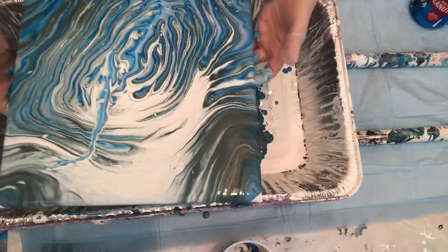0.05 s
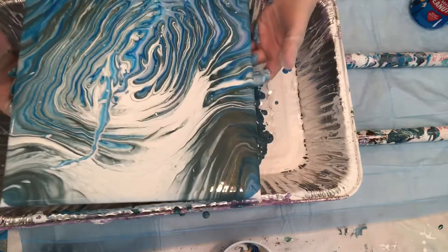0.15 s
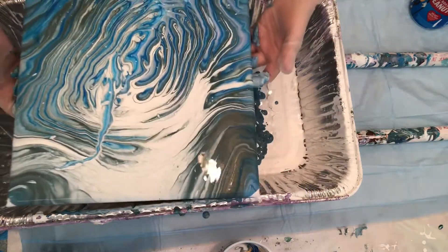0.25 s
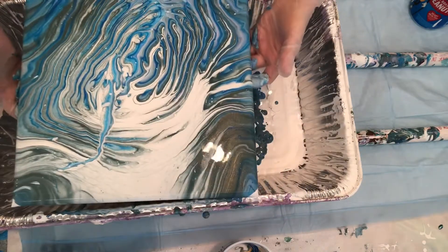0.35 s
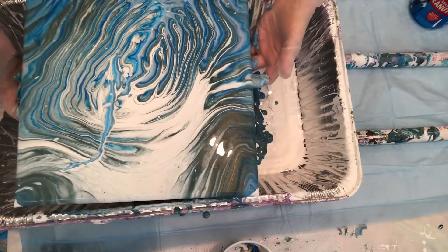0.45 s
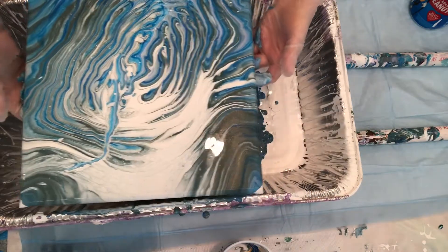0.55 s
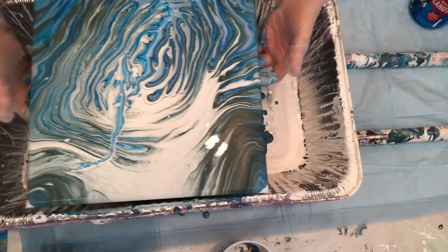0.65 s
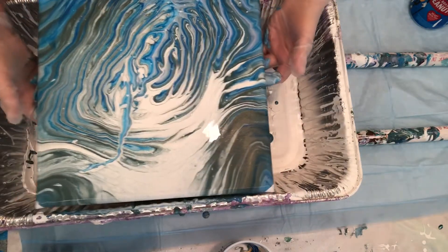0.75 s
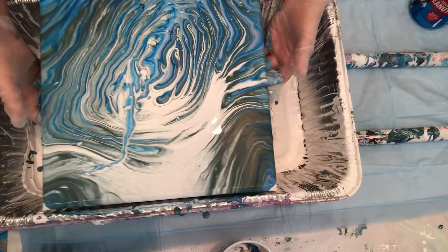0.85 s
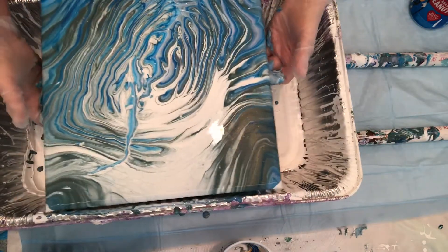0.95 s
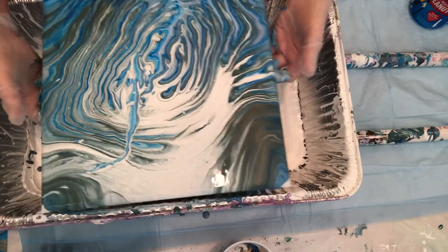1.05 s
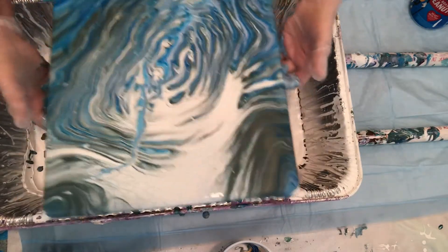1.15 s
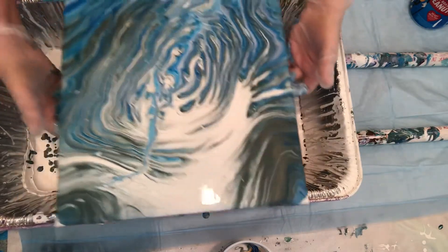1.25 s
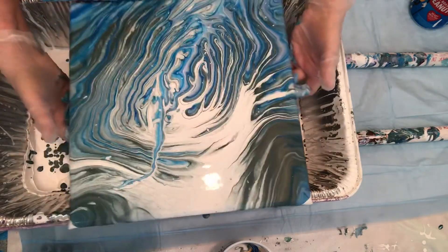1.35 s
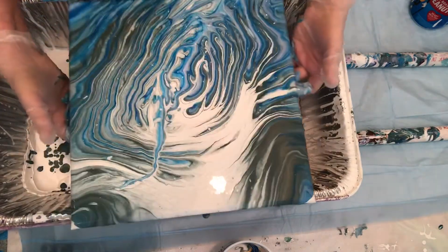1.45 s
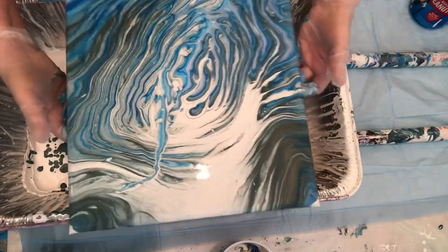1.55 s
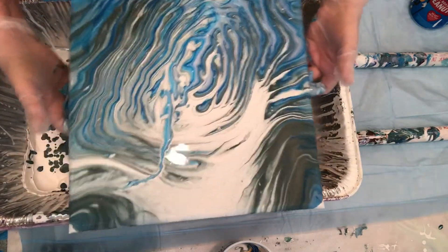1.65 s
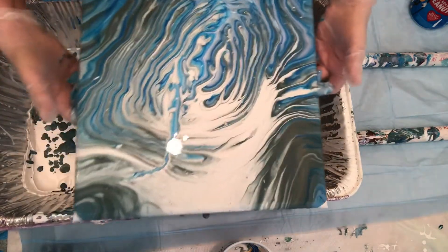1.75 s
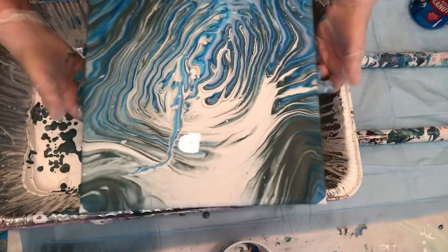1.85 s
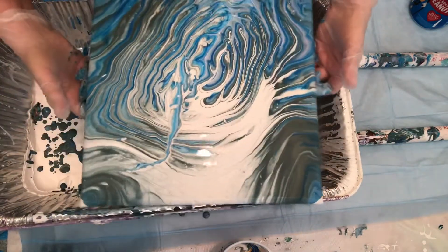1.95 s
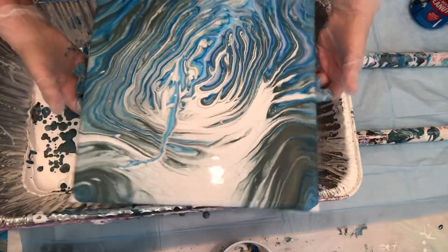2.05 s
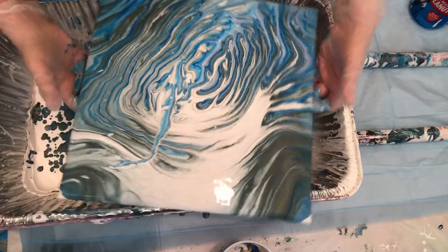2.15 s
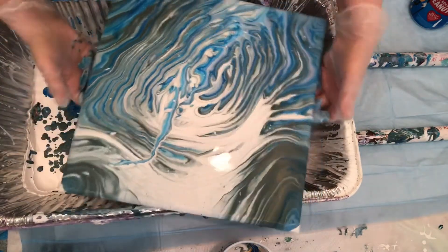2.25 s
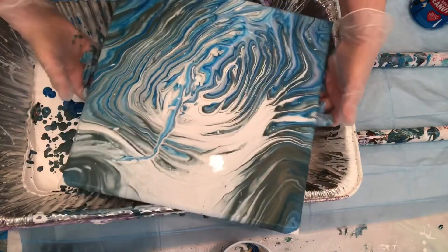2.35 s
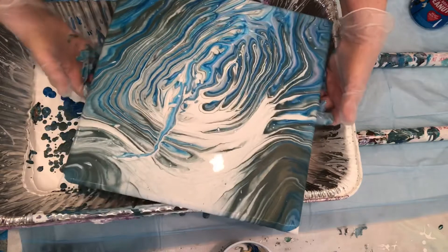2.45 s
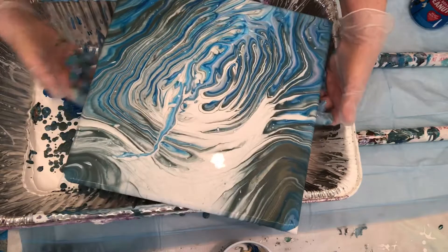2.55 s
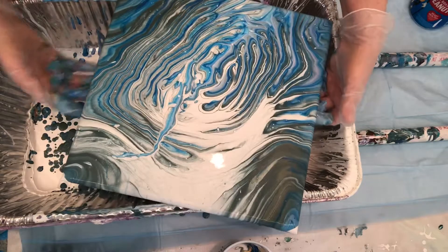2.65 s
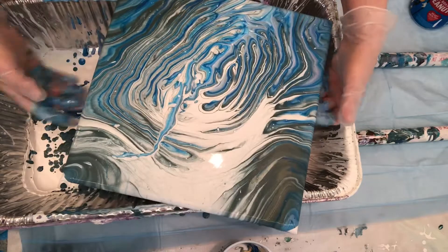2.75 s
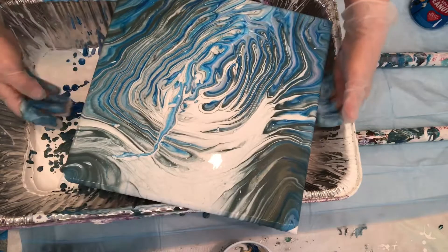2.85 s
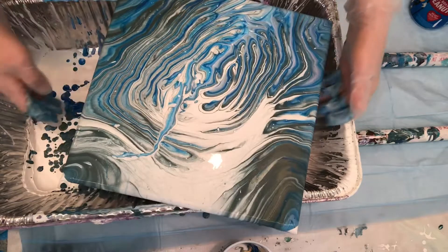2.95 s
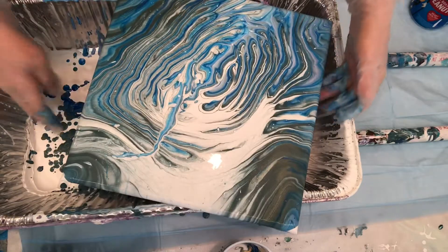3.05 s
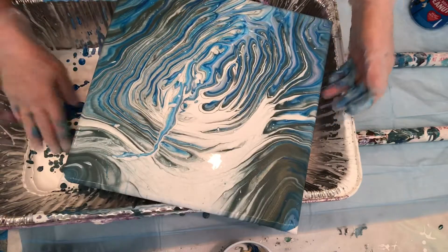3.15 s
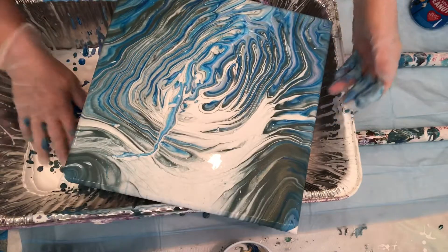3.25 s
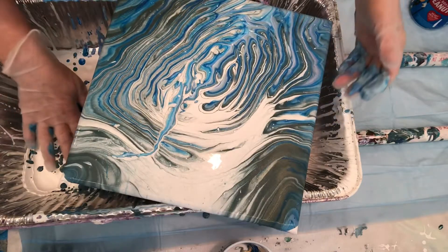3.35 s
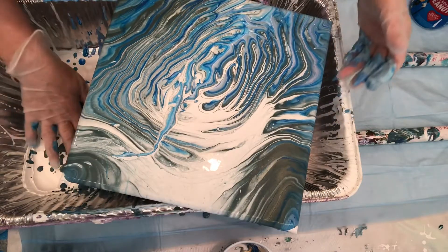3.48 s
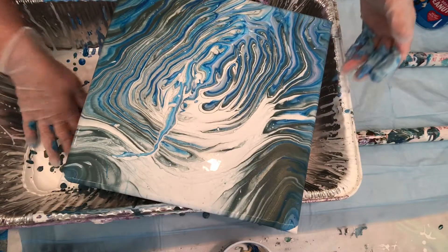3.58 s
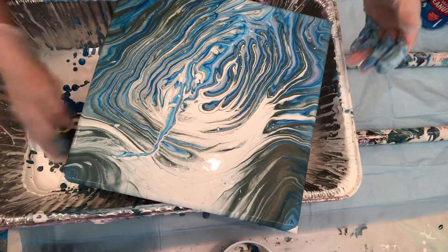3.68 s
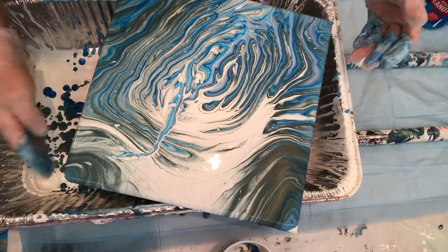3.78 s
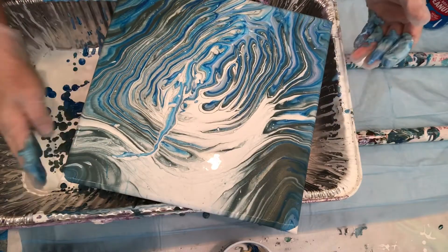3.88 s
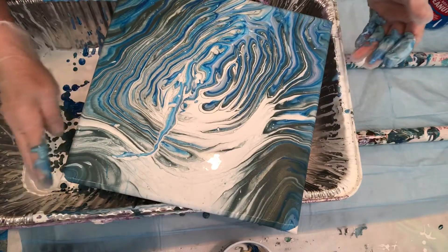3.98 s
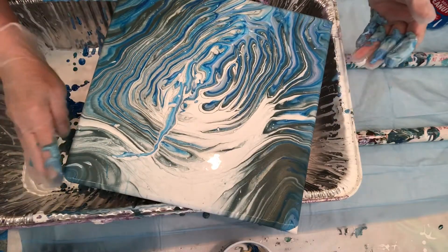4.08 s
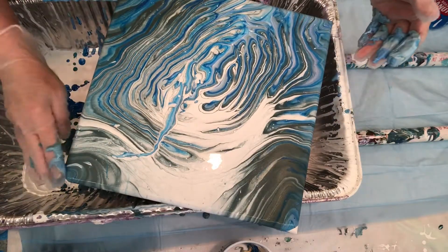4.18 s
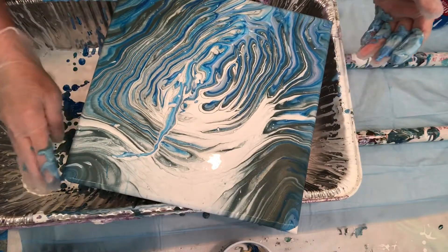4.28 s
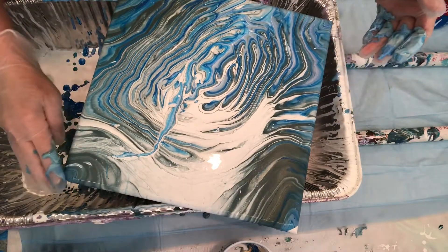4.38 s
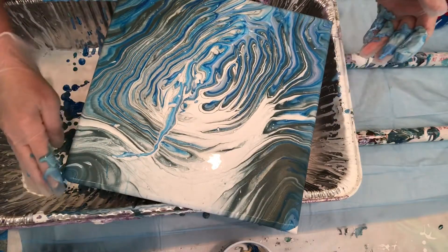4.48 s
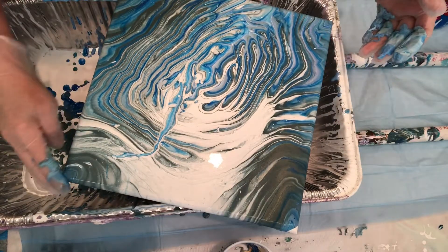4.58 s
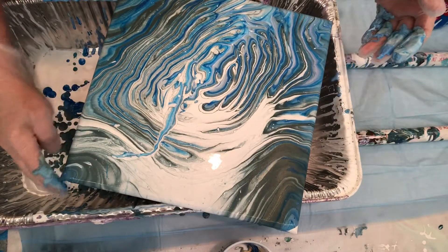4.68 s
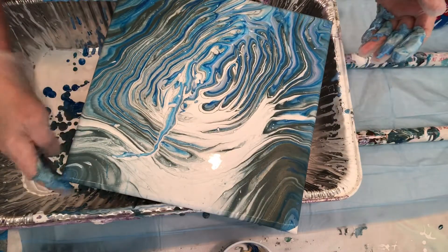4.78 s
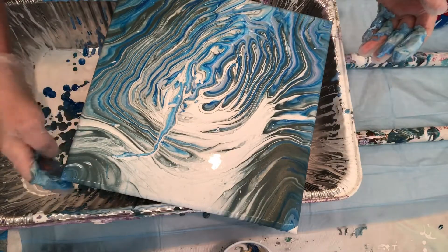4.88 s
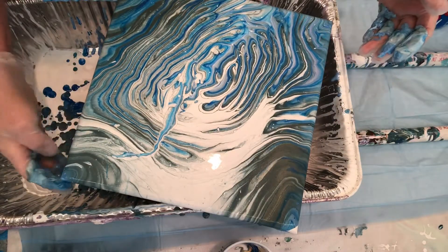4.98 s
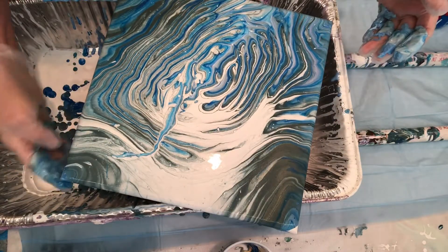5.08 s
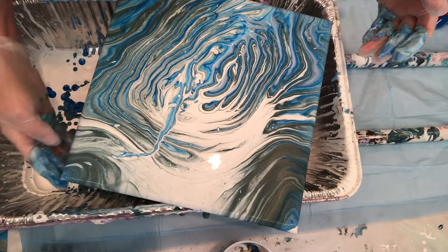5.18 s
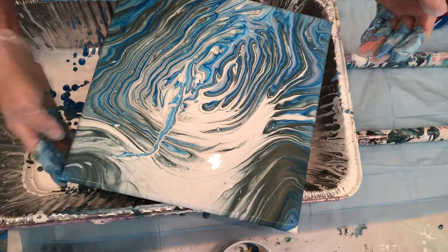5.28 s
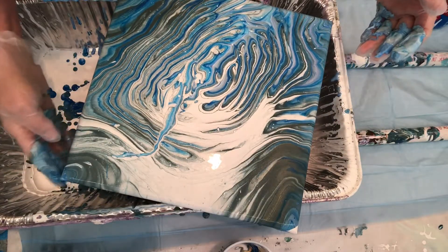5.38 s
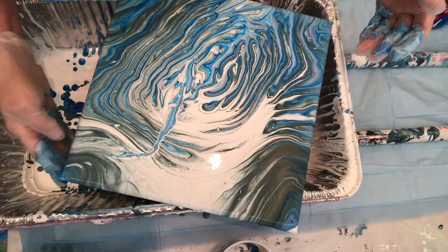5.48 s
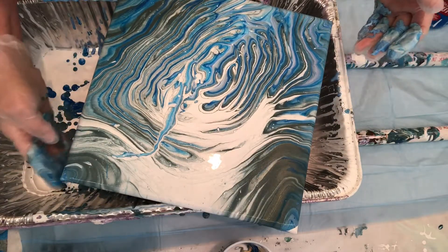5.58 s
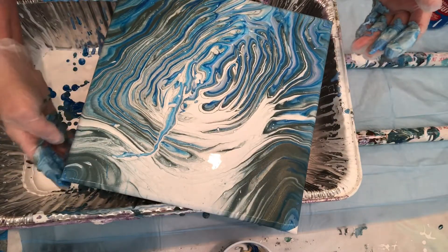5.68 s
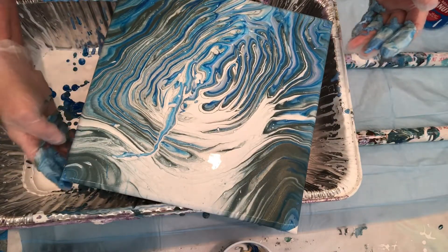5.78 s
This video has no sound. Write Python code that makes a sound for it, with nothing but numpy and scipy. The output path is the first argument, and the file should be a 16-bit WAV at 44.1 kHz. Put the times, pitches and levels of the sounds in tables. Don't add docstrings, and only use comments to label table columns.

```python
import sys
import numpy as np
from scipy import signal
from scipy.fft import rfft, irfft
from scipy.io import wavfile
from scipy.ndimage import uniform_filter1d

SR = 44100
rng = np.random.default_rng(int(sys.argv[2]) if len(sys.argv) > 2 else 0)


def to_wav(sig):
    pcm = np.clip(np.atleast_2d(sig), -1, 1) * 32767
    pcm = np.round(pcm).astype(np.int16)
    wavfile.write(sys.argv[1], SR, pcm.T)


def level_to_linear(level):
    exponent = np.asarray(level, float) / 20
    return 10 ** exponent


N = 257103

# pitch_hz, level_db, t60_s
CANVAS_MODES = [(262, -13, .08), (290, -9, .15), (327, 0, .2), (375, -14, .08), (428, -15, .2)]
# pitch_hz, level_db, t60_s
FRAME_MODES = [(436, -9, .06), (520, -4, .06), (590, -5, .06), (660, -4, .06), (745, -5, .045),
               (835, 0, .06), (910, -2, .05), (985, -4, .045), (1170, -6, .04), (1290, -4, .04),
               (1430, -3, .045), (1600, -13, .035), (1860, -9, .035)]
# pitch_hz, width_hz, level_db
ROD_MODES = [(2270, 85, -1), (2860, 100, -5), (3770, 130, -12), (5500, 170, 0), (6170, 200, -12),
             (6890, 250, -10), (7550, 300, -6), (8020, 220, 0), (8940, 300, -10), (10100, 450, -6)]
PUSH_ROUGH = 0.25
CANVAS_SCATTER_DB = 1.5


def evened(x):
    return x / np.sqrt(np.mean(x ** 2) + 1e-20)


def read(points, hz):
    f, value = np.transpose(points)
    return np.interp(np.log(hz + 1), np.log(f + 1), value)


def add(mix, start_s, sound):
    part = mix[round(start_s * SR):][:len(sound)]
    part += sound[:len(part)]


def colour(x, points):
    gain = level_to_linear(read(points, np.fft.rfftfreq(len(x), 1 / SR)))
    return evened(irfft(rfft(x) * gain, len(x)))


def resonate(x, hz, width_hz):
    return signal.lfilter(*signal.iirpeak(hz, hz / width_hz, SR), x)


def grains(per_s, spread_db):
    clicks = rng.standard_normal(N) * level_to_linear(spread_db * np.minimum(rng.exponential(1, N), 4))
    return evened(clicks * (rng.random(N) < per_s / SR))


def wander(smooth_s):
    size = max(round(smooth_s * SR), 2)
    return evened(uniform_filter1d(uniform_filter1d(rng.standard_normal(N), size), size))


def follow(rows, level_db):
    return level_to_linear(np.interp(np.arange(N) / SR, np.asarray(rows)[:, 0], level_db, -140, -140))


def ring(modes, t, contact_s, scatter_db, rough=0.74):
    detune = 0.015
    hz, db, t60_s = np.transpose(modes)[..., None]
    luck = rng.standard_normal((2, len(modes), 1))
    decay = level_to_linear(db + scatter_db * luck[0] - 60 * t / t60_s)
    waves = decay * np.sin(2 * np.pi * hz * (1 + detune * luck[1]) * t)
    contact = (1 - rough + rough * rng.standard_normal(len(t))) * t * np.exp(-t / contact_s)
    band = signal.butter(1, [hz.min() / 2, 1.95 * hz.max()], "band", fs=SR)
    soft = signal.lfilter(*band, contact)
    body = signal.fftconvolve(waves.sum(0), soft)[:len(t)]
    return body / np.sqrt(np.max(uniform_filter1d(body ** 2, 400)))


def burst(t, points, rise_s, crack_t60_s, tail, tail_t60_s):
    decay = level_to_linear(-60 * t / crack_t60_s) + tail * level_to_linear(-60 * t / tail_t60_s)
    return colour(rng.standard_normal(len(t)), points) * (1 - np.exp(-t / rise_s)) * decay


def streaked(x):
    depth_db, width_hz = 2.3, 60
    z = rfft(x)
    size = round(width_hz * N / SR)
    peaks = evened(uniform_filter1d(uniform_filter1d(rng.standard_normal(len(z)), size), size))
    return evened(irfft(z * level_to_linear(depth_db * peaks), len(x)))


def room_tone():
    # pitch_hz, level_db (per Hz)
    air_bands = [(12, -64), (20, -31), (43, -32), (52, -14.5), (75, -1.5), (151, -10.5), (297, -16.5),
                 (465, -13.5), (670, -20.5), (794, -20.5), (2120, -30.5), (2810, -28), (7600, -35),
                 (8600, -51)]
    # pitch_hz, width_hz, level_db
    hum_bands = [(69.5, 18, -74.5), (144.3, 5.6, -73.5), (286, 60, -75), (472.7, 7.6, -80.5)]
    out = level_to_linear(-69.0) * colour(rng.standard_normal(N), air_bands) * level_to_linear(2.05 * wander(0.043))
    for hz, width_hz, db in hum_bands:
        out = out + level_to_linear(db) * evened(resonate(rng.standard_normal(N), hz, width_hz))
    return out


def squeaks():
    # middle_s, length_s, pitch_hz, width_hz, level_db
    squeak_bands = [(0.027, 0.048, 3700, 400, -77.5), (0.62, 0.29, 2000, 250, -84),
                    (0.283, 0.094, 11200, 1100, -75), (2.87, 0.17, 12000, 4000, -76),
                    (2.86, 0.13, 5100, 200, -80), (3.7, 0.024, 800, 91, -69), (3.8, 0.01, 1680, 130, -77),
                    (3.2, 0.13, 6470, 440, -70), (5.045, 0.047, 3220, 300, -71), (1.015, 0.065, 3400, 250, -66),
                    (2.87, 0.12, 5300, 890, -71.5), (3.1, .03, 1130, 120, -65), (3.185, 0.1, 1110, 140, -61),
                    (3.27, 0.026, 1130, 62, -63), (2.61, 0.11, 1960, 64, -81), (5.1, 0.28, 1640, 140, -83),
                    (5.068, 0.035, 804, 140, -65.5), (5.45, 0.15, 462, 26, -77), (3.43, 0.045, 184, 92, -55),
                    (3, 0.36, 320, 250, -69.5), (3.42, 0.081, 387, 114, -60), (0.178, 0.043, 298, 21, -59.5),
                    (0.58, 0.44, 780, 150, -70.5),
                    (.55, .3, 11300, 900, -88),
        (3.69, .06, 1170, 160, -74),
        (4.9, .34, 1660, 260, -78),
        (4.8, .14, 813, 200, -78),
        (2.465, .06, 330, 40, -56),
                    (3.19, .2, 12000, 7000, -71), (3.3, .075, 11000, 8000, -73.5), (.755, .02, 14500, 2500, -60),
              (4.79, .06, 3070, 700, -71), (1.03, 0.095, 900, 200, -55.5), (3.23, .22, 9300, 350, -78),
              (3.15, .015, 4300, 700, -59), (1.025, 0.094, 2070, 600, -59), (1.05, .07, 4700, 900, -74),
              (1.3, .012, 5700, 1200, -50), (2.43, 0.26, 46, 22, -66.5), (.865, 0.037, 780, 1300, -60.5),
              (2.39, 0.032, 411, 38, -50), (2.62, .09, 900, 90, -70), (.64, .4, 2070, 90, -68),
              (.66, .36, 900, 90, -65), (.53, .16, 310, 60, -60), (.94, .05, 300, 60, -58),
              (1.04, .09, 3550, 150, -69), (1.25, .06, 6200, 120, -74), (1.26, .05, 8000, 150, -72),
              (5.595, .04, 3300, 300, -64)]
    t, out = np.arange(N) / SR, np.zeros(N)
    noise = rng.standard_normal(N) * level_to_linear(1.0 * wander(0.006))
    for middle_s, length_s, hz, width_hz, db in squeak_bands:
        swell = np.exp(-(2 * (t - middle_s) / length_s) ** 4)
        tone = evened(resonate(resonate(noise, hz, width_hz), hz, 2 * width_hz))
        out += level_to_linear(db) * swell * tone
    return out


def shaken(modes):
    # pitch_hz, level_db
    slip_tilt = [(300, 4), (900, 1), (1500, -5.5), (5000, -28)]
    unevenness_db, width_times_t60 = 2, 3.5
    slips = colour(grains(3000, 1.0) * level_to_linear(unevenness_db * wander(0.012)), slip_tilt)
    return evened(sum(level_to_linear(db) * resonate(slips, hz, width_times_t60 / t60_s) for hz, db, t60_s in modes))


def slides():
    # time_s, pressure_db, speed_db (hiss over pressure)
    drags = [
        [(.075, -58, -12), (.13, -57, -17), (.22, -72, -16), (.3, -50, -14), (.42, -62, -2.5), (.7, -60, -1),
         (.86, -57, -1.5), (.9, -62.5, -6), (.965, -66.5, -10)],
        [(.97, -68, -11), (.995, -52, -14), (1.07, -53.5, -4), (1.1, -62, -9), (1.18, -53.5, -7.5),
         (1.25, -58, -4), (1.29, -50.5, -9), (1.42, -56.5, -12.5), (1.62, -73, -11.5)],
        [(2.075, -46, -13), (2.12, -51, -11), (2.18, -58, -7), (2.26, -39.5, -11), (2.34, -55, -8),
         (2.4, -55, -10), (2.46, -56, -9), (2.5, -66.5, -1), (2.56, -84, -1)],
    ]
    # pitch_hz, level_db (per Hz)
    hiss_bands = [(710, -16), (1200, 5.5), (1730, -2.5), (2060, 7), (2710, 2), (4700, -3), (8530, -14),
                  (11500, -20), (15300, -20), (16000, -35)]
    drone = level_to_linear(0.5) * shaken(CANVAS_MODES) + shaken(FRAME_MODES)
    hiss = streaked(colour(grains(4000, 2.0) * level_to_linear(0.85 * wander(0.03)), hiss_bands))
    out = np.zeros(N)
    for drag in map(np.array, drags):
        pressure_db, speed_db = drag[:, 1], drag[:, 2]
        out += follow(drag, pressure_db) * drone + follow(drag, pressure_db + speed_db) * hiss
    return out


def shake_foil(t, foil_db, tick_db):
    # pitch_hz, level_db (per Hz)
    foil_bands = [(880, 9.5), (1500, 5.5), (1950, 4), (2210, 1), (2540, -0.5), (2930, -2), (7000, -16),
                  (9100, -26.5), (15400, -120)]
    # pitch_hz, level_db (per Hz)
    tick_bands = [(2500, -21), (4200, 4), (5000, 3.5), (6600, -1), (8100, -9.5), (11500, -8.5),
                  (14500, -14), (16000, -12), (16800, -36)]
    click = level_to_linear(2.0) * np.sin(2 * np.pi * 5500 * t) * np.exp(-((t - 0.00025) / 0.00014) ** 2)
    tick = burst(t, tick_bands, 0.00042, 0.0024, 0.4, 0.034) + click
    crackle = burst(t, foil_bands, 0.00077, 0.042, 0.29, 0.12)
    return level_to_linear(foil_db - 8.0) * crackle + level_to_linear(tick_db + 5.5) * tick


def wood(t, frame_db, canvas_db):
    frame_rise_s, canvas_rise_s = 0.0022, 0.0043
    frame = (1 - np.exp(-t / frame_rise_s)) * ring(FRAME_MODES, t, 0.0002, 3, 0.45)
    canvas = ring(CANVAS_MODES, t, 0.00053, CANVAS_SCATTER_DB, PUSH_ROUGH)
    canvas = (1 - np.exp(-t / canvas_rise_s)) * canvas
    return level_to_linear(frame_db + 4.0) * frame + level_to_linear(canvas_db - 6.0) * canvas


def tap(t, level_db):
    rise_s, contact_s, first_mode, scatter_db, canvas_db = 0.0006, 0.0012, 2, 1.5, -17
    frame = ring(FRAME_MODES[first_mode:], t, contact_s, scatter_db)
    frame = (1 - np.exp(-t / rise_s)) * frame
    canvas = ring(CANVAS_MODES, t, 0.00026, CANVAS_SCATTER_DB, PUSH_ROUGH)
    return level_to_linear(level_db - 0.5) * frame + level_to_linear(level_db + canvas_db) * canvas


def knocks():
    # pitch_hz, level_db, t60_s
    table_modes = [(72, -15, .3), (116, -6, .17), (158, -1, .16), (184, 1, .18)]
    # start_s, level_db, table_db, canvas_db, hardness_db (last three over level)
    landings = [(0.0775, -53.5, 12, 4, -14), (0.0894, -44, -8, -6, -27), (0.2421, -40, -30, 1, -53),
                (0.2489, -31.5, -3, -2, -16), (0.2597, -39.5, 10, -3, -20), (0.2675, -39, 10, -10, -28),
                (0.3048, -55, -11, -18, -4), (0.625, -55, 8, 4, -15), (.99, -62.5, 29.5, 0, -30),
                (1.112, -38, 8, -3, -9.5), (1.1304, -39.5, 6, 3.5, -11), (1.1578, -43.5, 10, -15, -15),
                (1.2778, -45, -1, 6, -12), (1.284, -36, 3, 0.5, -16), (1.2965, -49.5, 17, 6, 4),
                (1.3754, -44, -18, -6, -29), (2.0736, -41.5, 6, -0.5, -48), (2.0777, -38, 11.5, -10, -15),
                (2.089, -46, -16, 5, -7), (2.2039, -34, -9, -1, -60), (2.2068, -27.5, -22, -4, -8),
                (2.221, -32, 10, 4.5, -10), (2.2511, -37.5, 8, -1, -15), (3.3849, -53.5, 3, -1, -16),
                (3.427, -72, 28.5, 19, -15), (4.647, -65.5, -13, 4.5, -9)]
    # start_s, level_db, foil_db (over level)
    taps = [(0.22, -63, -7), (0.311, -43, 1), (.3165, -44, -2), (0.3592, -44.5, 2), (0.7639, -46, -2),
            (0.8442, -50.5, 10.5), (0.872, -49.5, 1), (.889, -56, -3), (0.96, -55.5, -1), (1.225, -49.5, 1),
            (1.3302, -50.5, 8), (1.4115, -39.5, 4.5), (1.4877, -55.5, 3), (1.5313, -54.5, 5),
            (1.609, -58, -1), (1.6485, -59, 5.5), (1.7259, -60.5, -6), (2.129, -46.5, -3),
            (2.1955, -49, 11), (2.3582, -49, 9), (2.3625, -43, 5), (2.435, -43, -1.5), (3.456, -88, -5),
            (4.49, -67.5, 11)]
    # start_s, level_db, sharpness_db (over level)
    snaps = [(0.235, -52, -8), (0.499, -47, -8), (0.7248, -43, -16), (0.748, -37.5, -0.5), (.9184, -73, 5),
             (3.145, -56, -3), (1.632, -78, 0), (2.609, -51, -7.5), (3.421, -54.5, -10), (3.748, -63, -21),
             (5.0585, -68.5, -22.5)]
    foil_share_db, foil_per_hardness, tap_tick_db = 11.5, 0.22, -24
    out, t = np.zeros(N), np.arange(9000) / SR
    swell = 1 - np.exp(-t / 0.0053)
    for start_s, db, table_db, canvas_db, hard_db in landings:
        thud = swell * ring(table_modes, t, 0.000093, 1.9, PUSH_ROUGH)
        add(out, start_s, level_to_linear(db + table_db - 11.5) * thud + wood(t, db, db + canvas_db))
        foil_db = db + foil_share_db + foil_per_hardness * hard_db
        add(out, start_s, shake_foil(t, foil_db, db + hard_db))
    for start_s, db, foil_db in taps:
        add(out, start_s, tap(t, db) + shake_foil(t, db + foil_db, db + foil_db + tap_tick_db))
    for start_s, db, sharp_db in snaps:
        add(out, start_s, shake_foil(t, db, db + sharp_db))
    return signal.sosfilt(signal.butter(5, 66, "high", fs=SR, output="sos"), out)


def thocks():
    # start_s, level_db, pitch_hz, t60_s
    corners = [(2.2032, -15, 746, 0.023), (2.2075, -21.5, 1180, .02), (2.2205, -22, 845, 0.029),
               (1.2865, -34, 925, 0.032), (1.116, -39, 790, 0.017), (1.117, -37, 1300, 0.035),
               (.095, -44, 610, 0.077), (2.0735, -34, 630, .025), (0.62, -43, 1800, 0.026),
               (4.645, -50, 390, 0.05), (4.648, -66, 1700, .03), (2.437, -40, 920, 0.059),
               (2.362, -41, 500, 0.055), (1.225, -46, 1000, .025), (.961, -55, 800, .025),
               (3.383, -55, 900, .02), (.627, -46, 800, .03), (2.207, -28, 1400, .03),
               (1.288, -36, 1250, .03), (1.4135, -46, 4700, .012), (1.33, -52, 3700, .02)]
    # start_s, level_db, pitch_hz, t60_s
    booms = [(.247, -23, 328, .12), (.2485, -33.5, 570, 0.053), (.252, -36, 118, .25),
             (2.072, -32, 185, .06), (2.09, -39, 318, 0.13), (2.208, -30, 290, .13), (2.207, -28, 345, .12),
             (2.225, -29, 165, .2), (2.21, -28, 425, .12), (1.283, -31, 328, 0.19), (1.284, -34, 182, .17),
             (1.114, -33.5, 304, 0.17), (1.118, -36.5, 165, .15), (.078, -43, 187, .06),
             (.885, -53, 160, 0.11)]
    rise_turns, wobble_db, wobble_s = 0.6, 2.5, 0.008
    out, t = np.zeros(N), np.arange(9000) / SR
    for start_s, db, hz, t60_s in corners + booms:
        envelope = level_to_linear(db - 60 * t / t60_s) * (1 - np.exp(-t * hz / rise_turns))
        add(out, start_s, envelope * np.sin(2 * np.pi * hz * t))
    return out * level_to_linear(wobble_db * wander(wobble_s))


def flicks():
    # start_s, level_db
    rim_flicks = [
        (.2665, -58),
        (.4975, -54),
        (.7485, -50),
        (.9175, -60.5),
        (1.2965, -45),
        (2.2075, -55),
    ]
    # pitch_hz, level_db (per Hz)
    rim_bands = [(8000, -27), (10500, 1), (13500, 1), (15800, -1), (16800, -30)]
    out, t = np.zeros(N), np.arange(4000) / SR
    for start_s, db in rim_flicks:
        add(out, start_s, level_to_linear(db) * burst(t, rim_bands, 0.00037, 0.014, 0.15, 0.07))
    return out


def bounce(level_db):
    scatter_db, detune, contact_s, rise_s = 2.5, 0.01, 0.0018, 0.0008
    body_lag_s = 0.0052
    t = np.arange(2500) / SR
    hz, width_hz, mode_db = np.transpose(ROD_MODES)[..., None]
    luck = rng.standard_normal((2, len(ROD_MODES), 1))
    late = np.maximum(t - body_lag_s * (hz < 3000), 0)
    shape = (1 - np.exp(-late / rise_s)) * np.exp(-np.pi * width_hz * late)
    waves = np.sin(2 * np.pi * hz * (1 + detune * luck[1]) * late)
    rings = level_to_linear(mode_db + scatter_db * luck[0]) * shape * waves
    contact = rng.standard_normal(len(t)) * np.exp(-t / contact_s)
    band = signal.butter(4, [3000, 11000], "band", fs=SR, output="sos")
    click = signal.sosfilt(band, contact / np.linalg.norm(contact))
    return level_to_linear(level_db) * (level_to_linear(-6.5) * rings.sum(0) + level_to_linear(5.0) * click)


def rod():
    # start_s, level_db
    chatter = [
        (.3047, -44),
        (.3344, -48),
        (1.1625, -47),
        (1.1944, -49),
        (1.2263, -50),
        (1.2544, -50),
    ]
    # start_s, level_db
    bounces = [(2.346, -43), (2.41, -41.5), (2.4674, -48), (2.515, -46.5), (2.56, -45.5), (2.6085, -52),
               (2.653, -46.5), (2.691, -52), (2.7274, -50), (2.7614, -58), (2.7876, -59), (2.814, -56),
               (2.8373, -61)]
    lead_s, lead_db, lead_fade_db_per_s = 0.0095, -3, -70
    t = np.arange(N) / SR
    buzz = level_to_linear(-93.5) * grains(1500, 2.3) * np.exp(-((t - 2.6) / 0.3) ** 4)
    out = np.zeros(N)
    for hz, width_hz, db in ROD_MODES:
        out += level_to_linear(db - 7.0) * resonate(buzz, hz, width_hz) * SR / (np.pi * width_hz)
    for start_s, db in bounces:
        add(out, start_s, bounce(db))
        fade_db = lead_fade_db_per_s * (start_s - bounces[0][0])
        add(out, start_s - lead_s, bounce(db + lead_db + fade_db))
    for start_s, db in chatter:
        add(out, start_s, bounce(db))
    return out


def rub():
    # start_s, fastest_s, end_s, level_db, hollow_db (over level)
    strokes = [
        (2.54, 2.594, 2.76, -70.5, 2),
        (2.775, 2.85, 3.38, -66, -4),
        (3.067, 3.2, 3.24, -63, -1),
        (3.358, 3.404, 3.5, -75, 4),
        (3.407, 3.673, 3.75, -64, -3.5),
        (3.217, 3.275, 3.42, -65.5, -1.5),
    ]
    # pitch_hz, level_db (per Hz)
    cloth_bands = [(760, -29), (1300, -15), (1980, -1.5), (2860, -5.5), (3240, -4.5), (5200, -9),
                   (6350, -10), (10300, -23.5), (15200, -23), (16000, -27)]
    # pitch_hz, width_hz, level_db
    hollow_modes = [(770, 70, -1), (910, 67, 4), (1100, 290, -3.5)]
    bright_db, bright_per_db, loudest_db = -16.5, 4, -63
    t, out = np.arange(N) / SR, np.zeros(N)
    fibres = grains(9000, 0.54) * level_to_linear(0.47 * wander(0.023))
    hollow = evened(sum(level_to_linear(db) * resonate(resonate(fibres, hz, width_hz), hz, 9.9 * width_hz)
                        for hz, width_hz, db in hollow_modes))
    hollow = hollow * level_to_linear(1.7 * wander(0.029))
    cloth = streaked(colour(fibres, cloth_bands))
    fizz = colour(fibres, [(6000, -15), (9000, 11), (15000, 0), (16000, -31)]) * level_to_linear(0.94 * wander(0.019))
    for start_s, fastest_s, end_s, db, hollow_db in strokes:
        speed = np.interp(t, [start_s, fastest_s, end_s], [0, 1, 0]) ** 0.61
        fizz_db = bright_db + bright_per_db * (db - loudest_db)
        out += level_to_linear(db) * speed * (cloth + level_to_linear(hollow_db) * hollow + level_to_linear(fizz_db) * fizz)
    return out


def wipes():
    # middle_s, level_db, length_s, low_db (over level)
    finger_wipes = [(4.06, -75, 0.026, -19), (4.205, -82, 0.041, -14), (4.394, -77, 0.026, -14),
                    (4.58, -73, 0.044, -12), (4.774, -69.5, 0.083, -3), (4.945, -77.5, 0.11, -6),
                    (5.05, -71, 0.1, -1), (5.132, -76, 0.069, -23), (5.228, -63.5, 0.011, -2),
                    (5.244, -71.5, 0.02, -3), (5.318, -72, 0.039, -9), (5.411, -68.5, 0.026, -6),
                    (5.48, -65, 0.017, -9), (5.492, -73, 0.018, -6), (5.571, -67, 0.026, -14),
                    (5.593, -58, 0.054, -5.5), (5.744, -64.5, 0.041, -3), (5.825, -71, 0.072, 1)]
    # pitch_hz, level_db (per Hz)
    paint_bands = [(710, -69), (1200, -65), (1540, -8), (2060, -6.5), (2350, -2), (3250, -3), (3550, -7.5),
                   (3910, -6.5), (4040, -7), (16000, -28.5)]
    rise, fade = 0.66, 1.3
    t, out = np.arange(N) / SR, np.zeros(N)
    paint = grains(5000, 1.5) * level_to_linear(1.8 * wander(0.003))
    high = colour(paint, paint_bands) + level_to_linear(-12.5) * evened(resonate(paint, 3340, 230))
    low = evened(resonate(paint, 740, 190))
    for middle_s, db, length_s, low_db in finger_wipes:
        span_s = length_s * np.where(t < middle_s, rise, fade)
        swish = np.exp(-(2 * (t - middle_s) / span_s) ** 2)
        out += level_to_linear(db - 0.5) * swish * (high + level_to_linear(low_db) * low)
    return out


def walls(x):
    # pitch_hz, t60_s
    wall_decay = [(100, 0.12), (500, 0.32), (2000, 0.13), (8000, 0.27)]
    echoes = np.zeros(SR)
    at = np.arange(300, SR - 20, 20)
    echoes[at + rng.integers(0, 20, len(at))] = rng.choice([-1., 1.], len(at))
    hz, t, z = signal.stft(echoes, SR, nperseg=256)
    decay = level_to_linear(-60 * t / read(wall_decay, hz)[:, None])
    tail = signal.istft(z * decay, SR, nperseg=256)[1]
    return signal.fftconvolve(x, tail / np.linalg.norm(tail))[:N]


def scene():
    near = squeaks() + slides() + knocks() + thocks() + flicks() + rod() + rub() + wipes()
    return (near + level_to_linear(-10.0) * walls(near) + room_tone())[None]


def low_pass(x):
    return signal.sosfilt(signal.butter(12, 15820, fs=SR, output="sos"), x)


def record(dry):
    # pitch_hz, level_db (per Hz)
    hiss_bands = [(2000, -16), (6000, 0.5), (15150, -4), (15250, -70)]
    hiss = level_to_linear(-82.5) * colour(rng.standard_normal(N), hiss_bands)
    return low_pass(dry + hiss)


dry = scene()
out = record(dry)
to_wav(out)
```